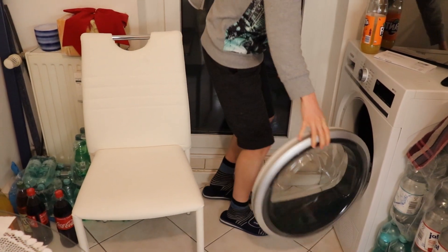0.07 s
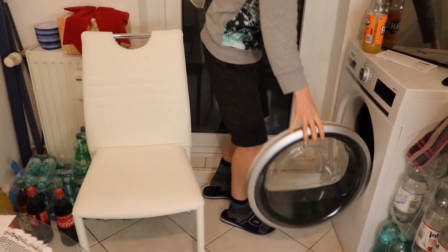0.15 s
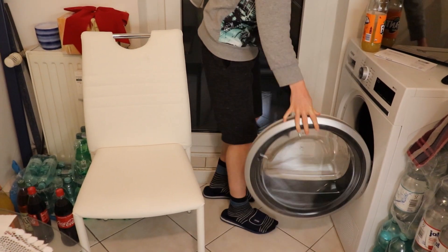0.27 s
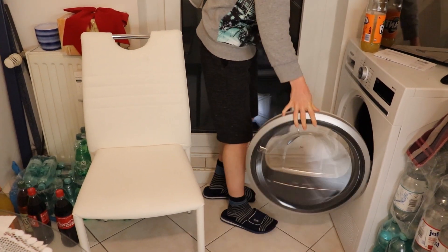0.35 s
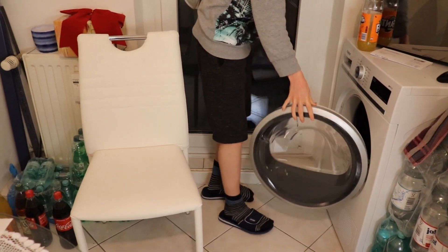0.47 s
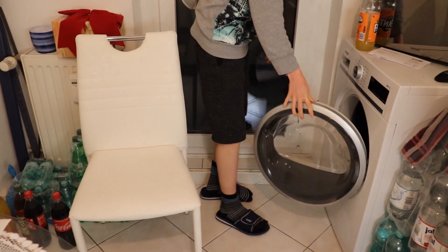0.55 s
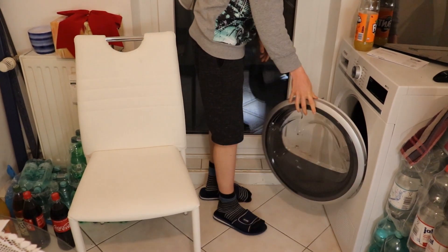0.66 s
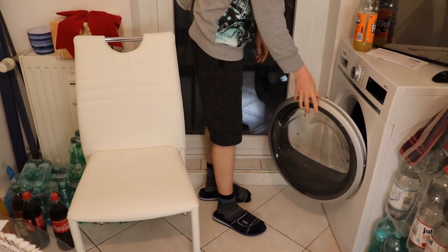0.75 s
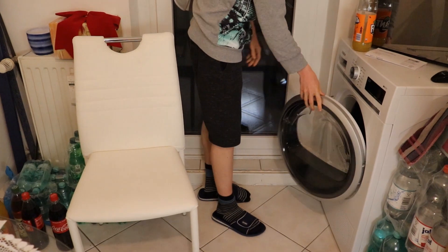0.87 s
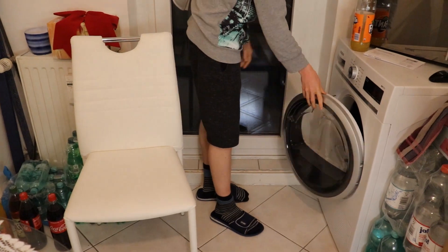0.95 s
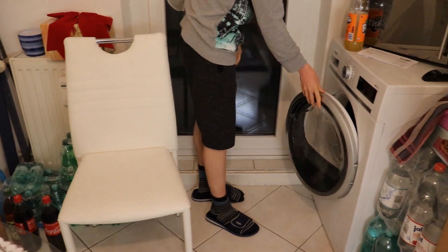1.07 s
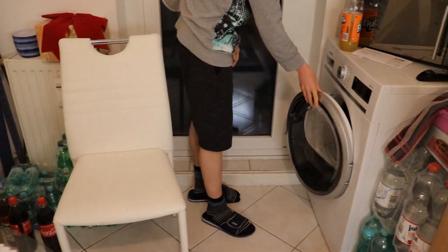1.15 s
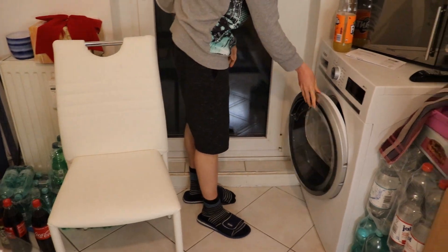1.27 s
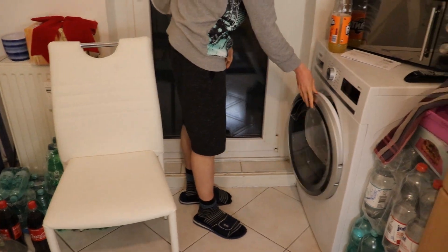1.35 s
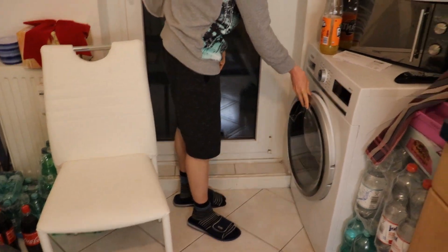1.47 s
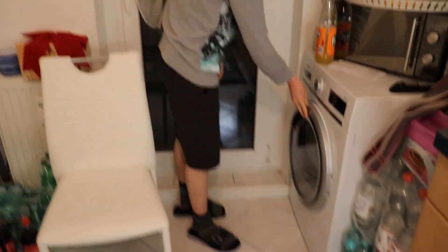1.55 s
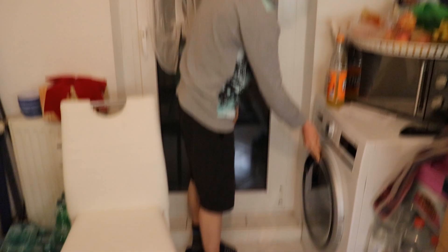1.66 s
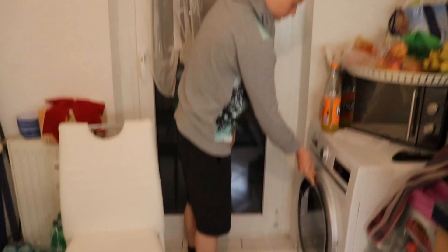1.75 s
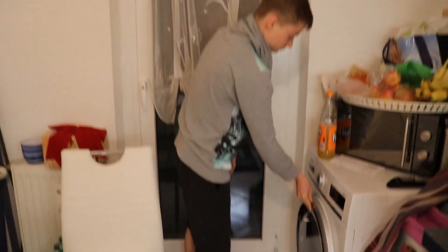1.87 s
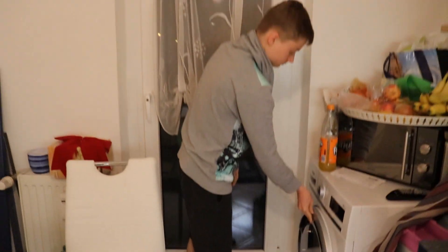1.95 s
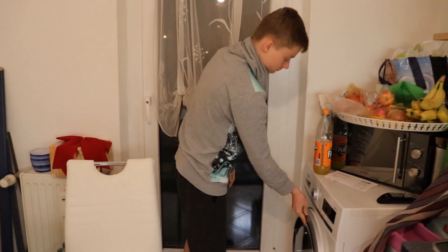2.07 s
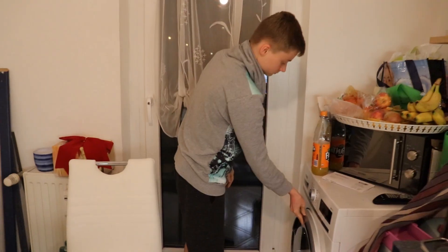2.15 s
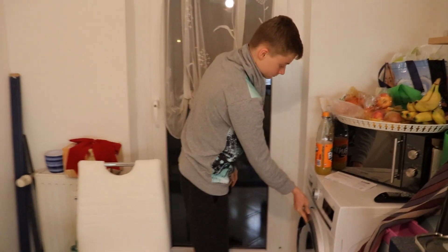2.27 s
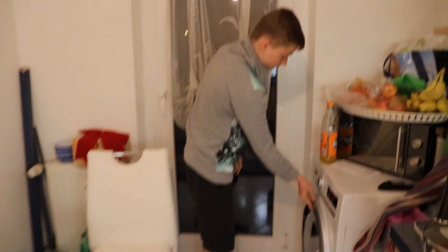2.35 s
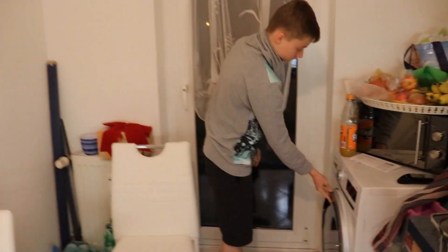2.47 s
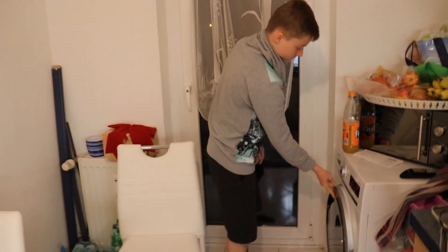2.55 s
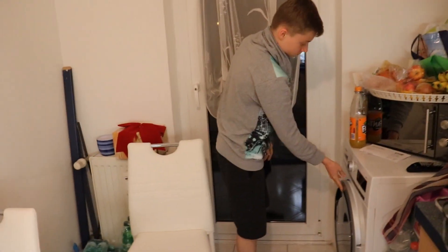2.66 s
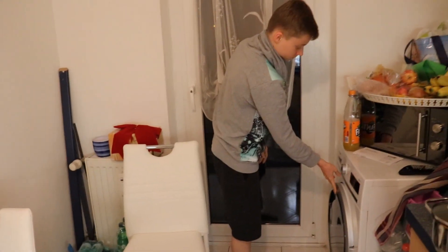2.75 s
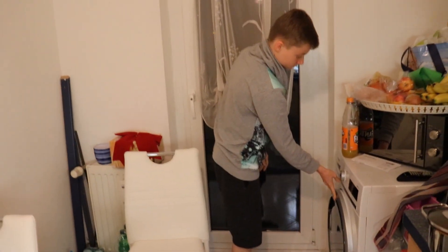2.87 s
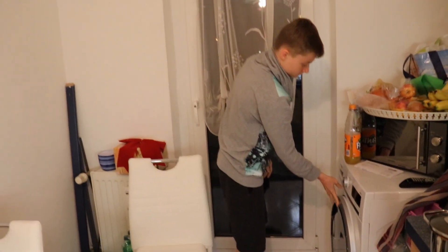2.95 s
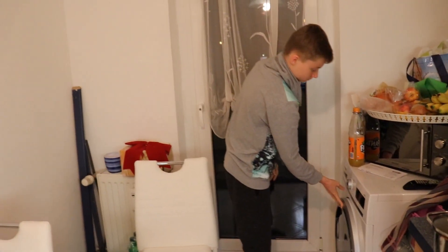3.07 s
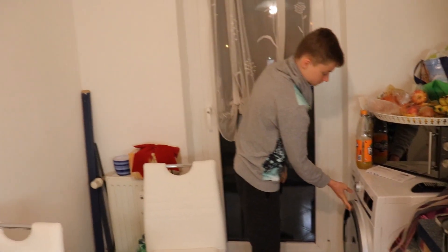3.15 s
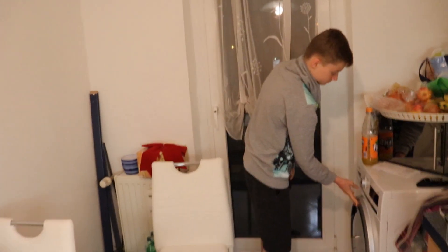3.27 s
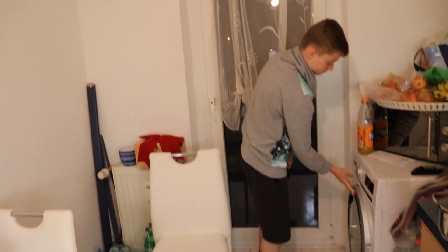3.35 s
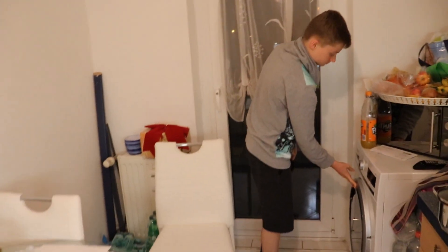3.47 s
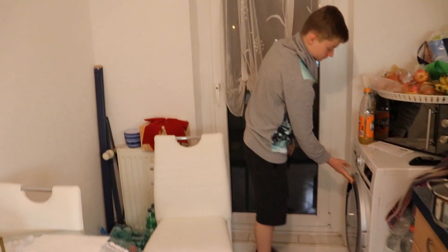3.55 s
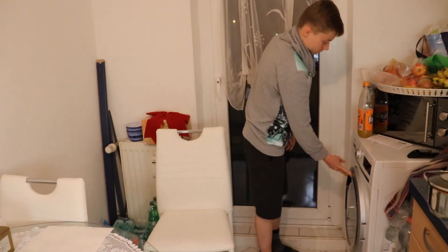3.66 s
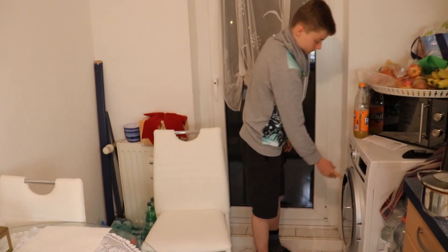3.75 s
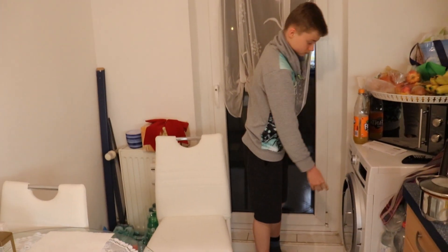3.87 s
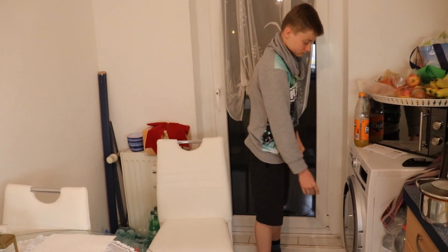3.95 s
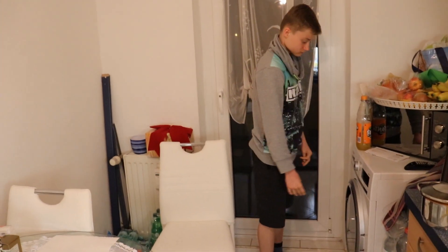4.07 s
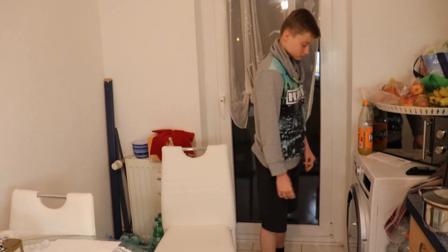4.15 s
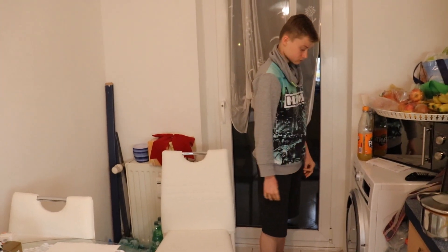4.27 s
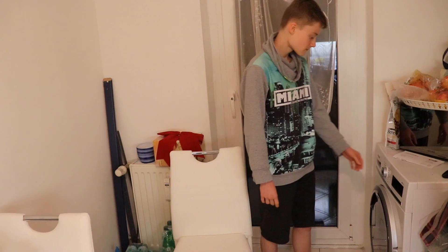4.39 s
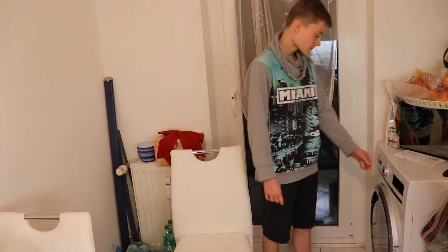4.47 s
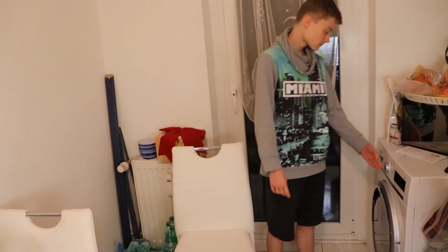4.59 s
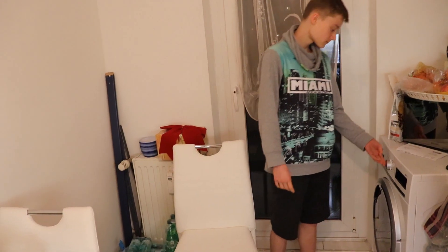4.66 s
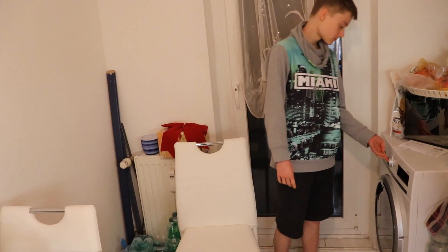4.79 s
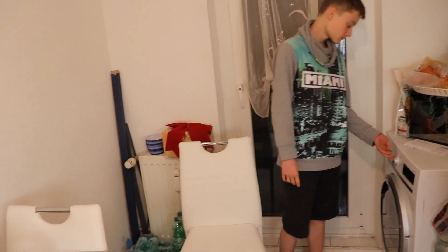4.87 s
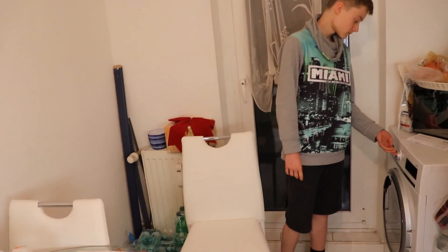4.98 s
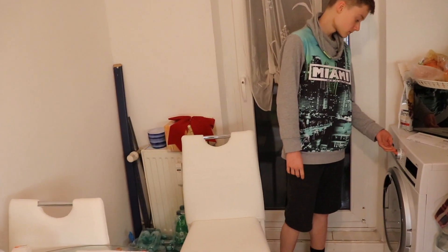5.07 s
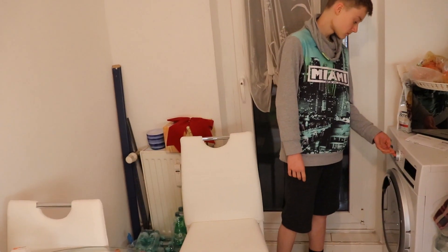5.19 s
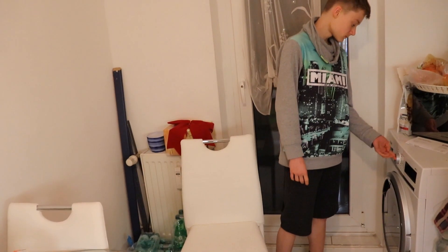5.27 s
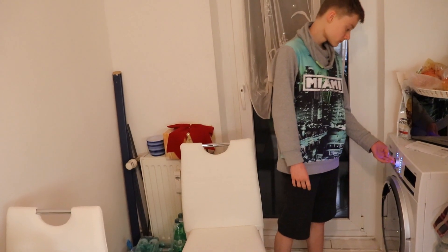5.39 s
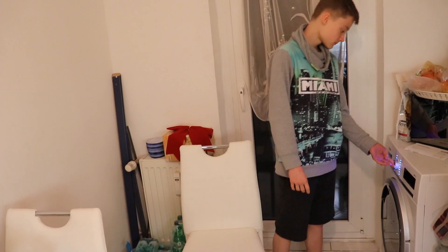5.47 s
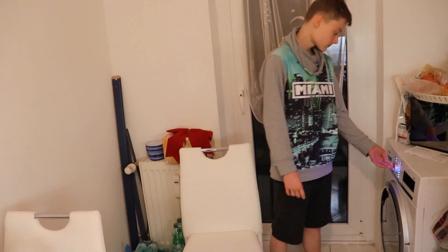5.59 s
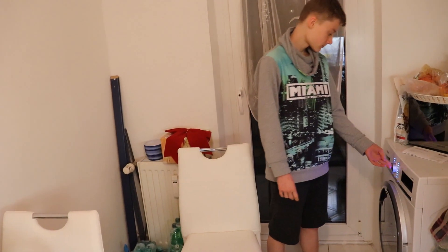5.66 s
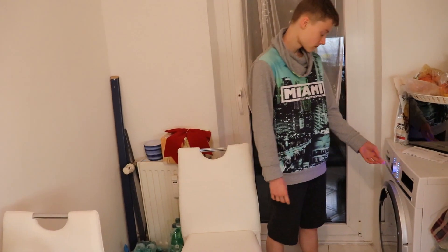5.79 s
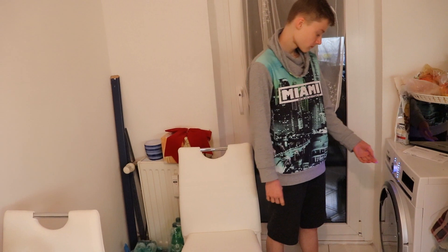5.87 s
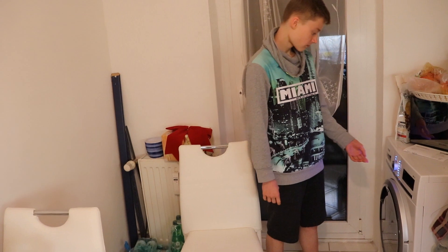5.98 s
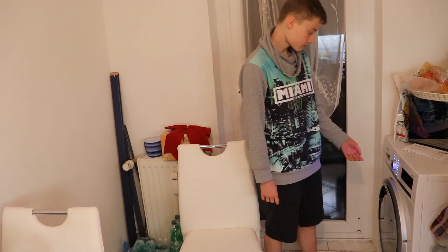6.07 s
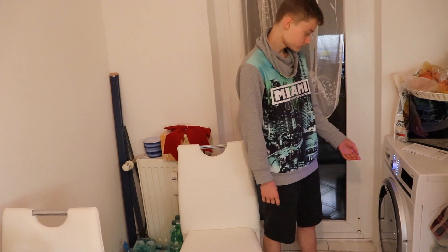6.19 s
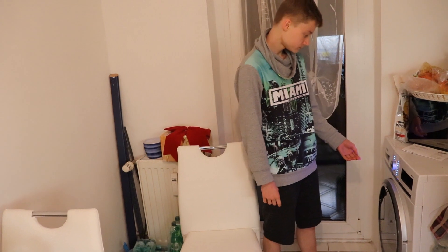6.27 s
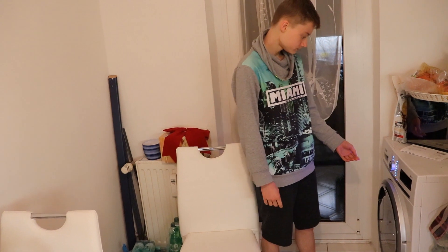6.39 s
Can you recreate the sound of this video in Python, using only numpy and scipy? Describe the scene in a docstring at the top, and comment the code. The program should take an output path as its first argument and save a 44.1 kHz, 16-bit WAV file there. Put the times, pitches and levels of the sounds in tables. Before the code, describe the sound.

In a tiled kitchen with a quiet fridge hum, soft ticks and cloth rustle come first. A washing machine door then bumps its latch with a rattling metallic boom, followed by light knocks and a rubber squeak. It slams shut with a sharp crack and deep cabinet thud. Hollow taps, a grinding knob, a dry snap and final clicks follow. Stereo microphone in the room, close and slightly hissy.

```python
"""A washing machine door bumps on its latch, is handled, then slams shut in a tiled kitchen with a humming fridge.
Noise bursts make the latch cracks and panel rattles; decaying modes make the booms of glass door and steel cabinet.
Shaped noise makes slippers, sleeves, rubber seal and knob grinding; ticks and a dry snap sound close to the microphone.
Hollow taps ring a box, the fridge sums shaft orders, the room adds a diffuse tail, and the input clips softly."""
import sys
import numpy as np
from scipy import signal
from scipy.fft import rfft, irfft, next_fast_len
from scipy.io import wavfile
from scipy.ndimage import map_coordinates

SR = 44100
rng = np.random.default_rng(int(sys.argv[2]) if len(sys.argv) > 2 else 0)


def log_audio(samples):
    """Write samples as a 16-bit WAV file to the path given in sys.argv[1]."""
    # one column per channel
    frames = np.atleast_2d(samples).T
    # limit to full scale, then quantise
    limited = np.clip(frames, -1, 1)
    pcm = np.round(limited * 32767).astype(np.int16)
    wavfile.write(sys.argv[1], SR, pcm)


N = 283254  # length in samples

# Steady air, room tone and microphone hiss: [f/Hz, relative level/dB per Hz]
AIR_SPECTRUM = [(76, -22), (130, -3.5), (147, -8.5), (207, -4.5), (386, -8), (444, -8), (533, -7),
                (577, -8), (797, -12.5), (1400, -14), (2670, -16), (3260, -16.5), (10900, -27.5),
                (14800, -29), (16000, -29.5)]
# Left-right likeness of steady sound: [f/Hz, correlation]
STEADY_LIKENESS = [(60, -0.22), (150, 0.81), (380, 0.66), (950, 0.49), (2380, -0.048), (5980, -0.058),
                   (15000, -0.077)]
# Left-right likeness of diffuse sound: [f/Hz, correlation]
DIFFUSE_LIKENESS = [(100, 0.97), (400, 0.88), (1000, 0.53), (2500, 0.064), (12000, 0.017)]
AIR_DB = -54

# Fridge hum at the microphone: [t/s, shaft level/dB, second order level/dB, upper orders level/dB]
FRIDGE_LEVELS = [(0, -69, -60.5, -56.5), (1.6, -66, -59.5, -57.5), (2.3, -62, -59.5, -55),
                 (3, -55, -59.5, -65), (3.8, -52.5, -59, -55), (4.3, -49.5, -56.5, -58.5),
                 (4.6, -53.5, -61.5, -60), (6.42, -54, -58.5, -60)]
# Upper orders of the compressor shaft: [order, relative level/dB]
UPPER_ORDERS = [(3, -8.5), (4, -7), (6, -9), (7, -8.5), (8, -4), (9, -2.5), (10, -14.5), (12, -13)]
SHAFT_HZ = 49.54  # mean shaft rate

# Ticks close to the microphone: [t/s, level/dB, f/Hz of the pitch, t60/s, left-right level/dB]
TICKS_NEAR = [(.251, -35.5, 2100, 0.15, -1), (0.2573, -42, 2570, 0.18, -3), (.329, -50, 1990, 0.094, -8),
              (0.3545, -46, 2330, 0.055, -7), (4.429, -54, 1660, 0.039, 0), (5.1862, -43, 1510, 0.093, -13)]
# Room decay: [f/Hz, t60/s]
ROOM_DECAY = [(150, 0.67), (1500, 0.43), (6000, 0.41), (15000, 0.22)]

# Slipper strokes on the tiles: [t/s of the start, length/s, level/dB]
SLIPPER_STROKES = [(0.576, 0.28, -44), (1.618, 0.18, -52.5), (2.865, 0.18, -45.5), (4.846, 0.097, -49)]
# Slipper colour: [f/Hz, relative level/dB per Hz]
SLIPPER_SPECTRUM = [(650, -31), (1100, -13), (1440, -11), (1820, -7.5), (4130, -5.5), (7650, -12),
                    (11700, -20.5), (14500, -19.5), (16000, -29)]
# Cloth and hands rubbing, one curve per passage: [t/s, level/dB]
RUB_LEVELS = [
    [(0, -44.5), (.19, -55), (.36, -47), (.5, -57)],
    [(1.1, -66), (1.2, -53), (1.35, -78)],
    [(2.1, -55), (2.25, -41), (2.35, -50.5), (2.65, -53), (2.9, -82), (3.1, -56.5), (3.45, -51)],
    [(4.65, -67), (4.82, -55), (4.9, -48), (4.97, -55), (5.08, -50.5), (5.55, -62.5)],
]
# Rubbing colour: [f/Hz, relative level/dB per Hz]
RUB_SPECTRUM = [(88, -48), (150, -11.5), (240, -7.5), (275, -14), (383, -8.5), (589, -11), (821, -10.5),
                (1830, -9.5), (16000, -26.5)]
SWISH_ATTACK, SWISH_RELEASE = 0.28, 0.39  # shares of the stroke length
SWISH_SAG_DB, SWISH_EDGE_DB = -0.5, -15  # at the end of the hold; at both ends of the stroke

# Door and cabinet contacts: [t/s, crack level/dB, rattle level/dB, boom level/dB,
# base rattle t60/s, hardness/dB per octave, f/Hz of the boom centre]
CONTACTS = [(1.7605, -30, -23.5, -30, 0.14, 0.5, 213), (1.765, -23, -17.5, -16, 0.31, -0.5, 213),
            (1.7756, -48, -22, -12.5, 0.5, -2, 277), (1.785, -48, -21.5, -23.5, 0.13, -2.5, 650),
            (1.7946, -42, -20, -20, 0.17, 1, 170), (1.9132, -37.5, -40, -26, 0.41, 2, 223),
            (1.9431, -43, -38, -28.5, 0.11, -5, 258), (2.0265, -65, -54.5, -40, 0.66, 6, 190),
            (2.1338, -45, -46, -59, 0.23, -1, 216), (2.196, -42, -50, -46, 0.13, 2, 800),
            (2.2024, -32, -39.5, -36.5, 0.23, 1, 366), (2.2568, -38, -42, -40, 0.21, 1, 493),
            (2.3516, -41, -42, -50, 0.61, 1.7, 800), (2.4416, -44, -45.5, -42, 0.68, 0.5, 377),
            (2.634, -51, -42, -41.5, 0.85, -2.5, 226), (2.674, -40.5, -40.5, -42, 0.31, -1, 355),
            (2.751, -43, -41, -34, 0.25, 5, 240), (2.79, -60, -45, -39, .2, 0, 240),
            (3.0649, -45.5, -47, -54, 0.71, 0.3, 194), (3.1592, -62, -50.5, -39, 0.4, -0.5, 222),
            (3.322, -41.5, -42, -39, 1, 2.1, 331), (3.4124, -41.5, -39.5, -32, 1, 1.5, 97),
            (3.457, -7.5, -13, -17, 0.16, 3.5, 352), (3.4618, -15.5, -27, -27, 0.077, -4, 352),
            (3.4783, -45, -20, -14.5, 0.51, -1.6, 156), (3.57, -62, -27.5, -19, 0.69, 0, 197),
            (3.6591, -38, -32.5, -28.5, 0.38, -3, 137), (3.7607, -49, -45, -40, 0.48, 4.5, 151),
            (3.8388, -43, -43.5, -42, 0.56, 3.5, 98), (3.9117, -59, -39.5, -37.5, 0.46, -7.5, 92)]
# Latch crack colour: [f/Hz, relative level/dB per Hz]
CRACK_SPECTRUM = [(530, -47), (900, -10), (1990, -6.5), (2450, -3), (3270, 3.5), (6190, -12), (6730, -7.5),
                  (8990, -13.5), (12300, -12.5), (16000, -19.5)]
# Modes of the steel latch hook: [f/Hz, relative level/dB, t60/s]
HOOK_MODES = [(1516, -7, 0.029), (1940, -14, 0.036), (2640, -15, 0.044), (3400, -6, 0.02),
              (14920, 0.5, 0.012)]
# Latch bearing as the microphone swings: [t/s, left-right level/dB]
LATCH_BEARING = [(1.76, -2), (1.95, -3), (2.4, -3.5), (3.46, -4.5)]
# Shading by the body that holds the microphones: [f/Hz, share of the left-right dB]
BODY_SHADOW = [(2000, 2.7), (8000, 0.3), (13000, 3)]
# Panel rattle colour: [f/Hz, relative level/dB per Hz]
RATTLE_SPECTRUM = [(290, -3), (500, 0), (570, -6.5), (649, 3.5), (1320, -1.5), (1740, 0.5), (1980, -3),
                   (2330, -3), (4280, -12.5), (6610, -17), (9490, -25.5), (15100, -30.5), (16000, -40)]
# Change of rattle colour once the door is latched: [f/Hz, level/dB]
LATCHED_RATTLE = [(400, 1.5), (600, -2.5), (1100, -3.5), (1800, 0.5), (3000, 0)]
# Rattle decay: [f/Hz, t60 as a share of the base t60]
RATTLE_DECAY = [(400, 0.69), (1000, 0.87), (1900, 1.045), (3500, 0.95), (7000, 1.12), (14000, 1)]
# Free modes of the glass door: [f/Hz, relative level/dB, t60/s]
DOOR_MODES = [(53.4, -5, .4), (133.6, -3, 0.45), (176.5, -2, 0.24), (240.2, -1.5, 0.4), (348, -6, 0.29),
              (383.4, -8, 0.4), (587, -8.5, 0.15), (625.7, -1.5, 0.24), (727, 0.5, 0.15), (803, -14, 0.1),
              (1050, -9, 0.1)]
# Free modes of the steel cabinet: [f/Hz, relative level/dB, t60/s]
CABINET_MODES = [(48.8, -8.5, 0.96), (85.5, -5.5, 0.7), (97.8, -5, 0.36), (138.3, -8.5, 0.75),
                 (179.2, -6.5, 0.73), (202.8, -7.5, 0.61), (258.5, -14, 0.54), (312.7, -9, 0.7),
                 (367.5, -3.5, 0.37), (416, -11.5, 0.32), (476, -18, 0.38), (668, -14.5, 0.52)]
LATCHED_S = 3.45
LOOSE_DOOR, SHUT_DOOR = 0.69, 0.38  # door's share of the boom before and after latching
DOOR_DAMPING, CABINET_DAMPING = 0.69, 0.99  # t60 as a share of the free modes'
HARD_RISE_S, SOFT_RISE_S = 0.0013, 0.0014  # base rise of the hardest and softest blow
WAVER = 0.84  # phase wander of the panel modes, radians
FLUTTER_DB = 2.5  # level wander of a mode per radian of phase wander

# Loose parts set chattering: [t/s, level/dB, t60/s, f/Hz of the median pitch]
SHAKES_LOOSE = [(1.766, -25, .45, 1750), (1.79, -29, 0.46, 1054), (2.196, -48, 0.17, 844),
                (2.351, -48, .1, 855), (3.475, -25.5, .6, 1790), (3.59, -35, 0.53, 1890)]
CHATTER_SPREAD, CHATTER_SCATTER_DB = 0.19, 6  # standard deviations: natural log of pitch; tap level
CHATTER_CYCLES = 13  # cycles in which a tap falls 20 dB

# Rubber seal dragging on the door rim, one curve per drag: [t/s, level/dB, f/Hz of its resonance]
SEAL_DRAGS = [
    [(2.37, -72, 2160), (2.5, -58, 1850), (2.56, -47.5, 1490), (2.63, -61, 1385)],
    [(3.325, -49, 1490), (3.4, -54, 1486), (3.455, -42, 1510)],
]

# Taps on a hollow box: [t/s, ring level/dB, scratch level/dB]
BOX_TAPS = [(4.489, -27, -37.5), (4.51, -32, -62), (4.525, -33, -57), (4.535, -41.5, -50),
            (4.603, -38, -46), (4.615, -45, -52), (4.625, -36.5, -53.5)]
# Box modes: [f/Hz, relative level/dB, t60/s]
BOX_MODES = [(210, -3.5, 0.055), (292, -4, 0.067), (347, -2.5, 0.081), (420, -1.5, 0.037),
             (555, -1.5, 0.035), (630, -8, 0.034), (738, -14, 0.063)]
# Scratch colour of the taps: [f/Hz, relative level/dB per Hz]
SCRATCH_SPECTRUM = [(600, -1.5), (1200, 1), (1800, 2), (2500, 0), (3700, 0), (5000, -10), (15000, -23.5)]

# Knob detents: [t/s, click level/dB, unused level/dB, grinding level/dB, base t60/s]
KNOB_DETENTS = [(4.999, -48, -55, -45.5, 0.23), (5.0424, -46.5, -45, -44.5, 0.47),
                (5.1465, -33, -60, -37, 0.12), (5.161, -39, -50, -31.5, .1), (5.172, -38, -43, -36, 0.097),
                (5.179, -44, -44, -36, .06), (5.1895, -46.5, -61, -37, 0.22), (5.749, -50, -60, -62, 0.22),
                (5.77, -34, -41, -41.5, 0.38), (5.7933, -28, -48, -43, 0.2),
                (5.8381, -37.5, -37.5, -39.5, 0.21)]
# Knob resonances, all following the click level: [f/Hz, width/Hz, relative level/dB, unused]
KNOB_RESONANCES = [(101, 46, -13.5, 0.12), (190, 180, -3, 0.049), (1290, 500, -3.5, 1)]
# Ring of the knob shell: [f/Hz, relative level/dB, t60/s]
SHELL_MODES = [(1325, 2.5, 0.053), (1210, -10, 0.06)]
# Grinding colour: [f/Hz, relative level/dB per Hz]
GRIND_SPECTRUM = [(500, -16.5), (1200, -1), (3500, 7.5), (6500, 2), (9000, -4), (16000, -16)]
DULL_DB, BRIGHTENS = -4.5, 0.25  # tilt per octave at a -31.5 dB click; its growth per dB of click
SHELL_DB = -2.5  # shell ring relative to the click

# Dry snap close to the microphone: [t/s, level/dB, left-right level/dB]
DRY_SNAPS = [(5.598, -36, -6)]
# Snap modes: [f/Hz, relative level/dB, t60/s]
SNAP_MODES = [(453, -7, 0.0088), (890, 1.5, 0.013), (1890, -0.5, 0.0078), (3500, -3.5, 0.006),
              (6640, -2, 0.0045), (9500, -9.5, 0.0043)]

TOP_HZ = 16180  # band limit of the input


def amp(db):
    """Gain of a level in dB."""
    return 10 ** (np.asarray(db) / 20)


def unit(x):
    """Scale to rms 1."""
    return x / np.sqrt(np.mean(x ** 2) + 1e-20)


def along(points, hz):
    """Interpolate (Hz, value) points on a log frequency axis."""
    f, v = np.transpose(points)
    return np.interp(np.log(hz + 1), np.log(f + 1), v)


def tilted(spectrum, db_per_octave):
    """Turn a spectrum about 2 kHz."""
    return [(hz, db + db_per_octave * np.log2(hz / 2000)) for hz, db in spectrum]


def gain(rows, column=1):
    """Gain per sample of a dB curve over time, at -150 dB outside it."""
    rows = np.array(rows)
    return amp(np.interp(np.arange(N) / SR, rows[:, 0], rows[:, column], -150, -150))


def wobble(rate):
    """A smooth random curve with rate knots a second."""
    knots = rng.standard_normal(int(N * rate / SR) + 4)
    return map_coordinates(knots, [np.arange(N) * rate / SR])


def filtered(x, response):
    """Filter x by a complex response of frequency."""
    n = x.shape[-1]
    m = next_fast_len(n + 8192)
    return irfft(rfft(x, m) * response(np.fft.rfftfreq(m, 1 / SR)), m)[..., :n]


def pair(size, spectrum, alike):
    """Stereo noise of rms 1, its mid-side balance set by the left-right likeness."""
    def mid_side(hz):
        angle = np.arccos(np.clip(along(alike, hz), -1, 1)) / 2
        return amp(along(spectrum, hz)) * [np.cos(angle), np.sin(angle)]

    mid, side = filtered(rng.standard_normal((2, size)), mid_side)
    return unit(np.array([mid + side, mid - side]))


def dying(noise, t60, rise=0.00044):
    """Noise whose frequencies each die with their own t60(Hz), after a short rise in seconds."""
    hz, t, z = signal.stft(noise, SR, nperseg=128)
    decay = amp(-60 * t / np.maximum(t60(hz), .01)[:, None])
    out = signal.istft(z * decay, SR, nperseg=128)[1]
    size = noise.shape[1]
    return out[:, :size] * (1 - np.exp(-np.arange(size) / SR / max(rise, 2e-4)))


def add(out, s, x, pan_db=0):
    """Mix a sound into stereo at s seconds, the left louder than the right by pan_db."""
    part = out[:, round(s * SR):][:, :x.shape[-1]]
    part += (x * amp([[pan_db / 2], [-pan_db / 2]]))[:, :part.shape[1]]


def ring(modes, t, stretch=1, centre_hz=200, focus_db=0, waver=0):
    """Decaying modes of random strength and phase, weaker away from the blow's centre pitch."""
    hz, db, t60 = np.transpose(modes)[:, :, None]
    luck = rng.standard_normal((2, len(modes), 1))
    db = db + 1.5 * luck[0] - focus_db * np.log2(hz / centre_hz) ** 2
    knots = rng.standard_normal((len(modes), 40))  # 40 a second
    wander = np.array([np.interp(t, np.arange(40) / 40, row) for row in knots])
    # each mode's level follows the wander rows in reverse order
    level = amp(db - 60 * t / (t60 * stretch) + FLUTTER_DB * waver * wander[::-1])
    phase = 2 * np.pi * hz * t + 2 * luck[1] + waver * wander
    return np.sum(level * np.sin(phase), axis=0)


def steady_air():
    """Room tone and microphone hiss as coloured noise with a slight level wander."""
    return amp(AIR_DB + 0.15 * wobble(3.8)) * pair(N, AIR_SPECTRUM, STEADY_LIKENESS)


def fridge():
    """The compressor hums on the orders of its shaft, with slightly unsteady speed and levels."""
    turn = 2 * np.pi * np.cumsum(SHAFT_HZ * (1 + 0.0028 * wobble(3))) / SR
    upper = sum(amp(db + 1.26 * wobble(8.7)) * np.sin(order * turn + rng.uniform(0, 2 * np.pi))
                for order, db in UPPER_ORDERS)
    first = gain(FRIDGE_LEVELS, column=1) * amp(0.71 * wobble(4.05)) * np.sin(turn)
    second = gain(FRIDGE_LEVELS, column=2) * amp(2.7 * wobble(18)) * np.sin(2 * turn)
    return np.sqrt(2) * (first + second) + gain(FRIDGE_LEVELS, column=3) * upper


def ticks():
    """Dry bright ticks: decaying broad noise peaked at a pitch."""
    out, t = np.zeros((2, N)), np.arange(4000) / SR
    for s, db, pitch_hz, t60, pan_db in TICKS_NEAR:
        colour = [(pitch_hz / 3, -25), (pitch_hz, 0), (16000, -9)]
        add(out, s, amp(db - 60 * t / t60) * pair(4000, colour, [(1000, 0.15)]), pan_db)
    return out


def kitchen(x):
    """The tiled room answers the mono sum with a diffuse tail of dying noise."""
    noise = pair(SR // 2, [(100, 0)], DIFFUSE_LIKENESS)
    tail = dying(noise, lambda hz: along(ROOM_DECAY, hz), 0.0058)
    return signal.fftconvolve(x.mean(axis=0)[None], tail / np.linalg.norm(tail[0]), axes=1)[:, :N]


def rubbing():
    """Slippers swish on the tiles with attack, sagging hold and release; cloth and hands rub in uneven grains."""
    shape = [(0, SWISH_EDGE_DB), (SWISH_ATTACK, 0), (1 - SWISH_RELEASE, SWISH_SAG_DB), (1, SWISH_EDGE_DB)]
    strokes = sum(gain([(s + length * share, db + step_db) for share, step_db in shape])
                  for s, length, db in SLIPPER_STROKES)
    swish = strokes * amp(0.35 * wobble(40)) * pair(N, SLIPPER_SPECTRUM, DIFFUSE_LIKENESS)
    grains = amp(1.3 * wobble(30) + 2.36 * wobble(250))
    rub = unit(grains * pair(N, RUB_SPECTRUM, DIFFUSE_LIKENESS))
    return swish + sum(map(gain, RUB_LEVELS)) * rub


def latch_crack(crack_db, hard_db, pan_db):
    """A short noise burst and the steel hook's ring, shaded between the two microphones."""
    t = np.arange(2000) / SR
    crack = pair(2000, tilted(CRACK_SPECTRUM, hard_db), [(1000, 0.37)])
    crack *= amp(-60 * t / 0.048) * (1 - np.exp(-t / 0.00091))
    hook_gain = amp(0.46 * (crack_db + 9))  # the hook's share grows with harder blows
    crack += hook_gain * ring(HOOK_MODES, t) * (1 - np.exp(-t / 0.00015))
    shaded = lambda hz: amp(np.outer([.5, -.5], pan_db * along(BODY_SHADOW, hz)))
    return amp(crack_db) * filtered(crack, shaded)


def panel_rattle(size, latched, t60, hard_db, rise):
    """Diffuse noise dying by frequency, its colour changed once the door is latched."""
    colour = [(hz, db + latched * along(LATCHED_RATTLE, hz))
              for hz, db in tilted(RATTLE_SPECTRUM, hard_db)]
    return dying(pair(size, colour, DIFFUSE_LIKENESS), lambda hz: t60 * along(RATTLE_DECAY, hz), rise)


def panel_boom(t, door_share, boom_db, boom_hz, rise):
    """Wavering modes of door and cabinet, stirred around the blow's centre pitch."""
    focus_db = 2.0 + 0.45 * max(-25.5 - boom_db, 0)  # a light touch stirs only a few modes
    door = ring(DOOR_MODES, t, DOOR_DAMPING, boom_hz, focus_db, WAVER)
    cabinet = ring(CABINET_MODES, t, CABINET_DAMPING, boom_hz, focus_db, WAVER)
    boom = door_share * door + (1 - door_share) * cabinet
    return amp(boom_db) * boom * (1 - np.exp(-t / (rise + 0.0013))) ** 2


def knocks():
    """Each contact cracks at the latch, rattles the panels and booms in door and cabinet."""
    (cracks, rattles, booms), size = np.zeros((3, 2, N)), int(.7 * SR)
    t = np.arange(size) / SR
    for s, crack_db, rattle_db, boom_db, rattle_t60, hard_db, boom_hz in CONTACTS:
        door_share = LOOSE_DOOR if s < LATCHED_S else SHUT_DOOR
        rise = np.interp(crack_db, [-60, -5], [SOFT_RISE_S, HARD_RISE_S])
        pan_db = np.interp(s, *np.transpose(LATCH_BEARING))
        add(cracks, s, latch_crack(crack_db, hard_db, pan_db))
        rattle = panel_rattle(size, s > LATCHED_S, rattle_t60, hard_db, rise)
        add(rattles, s, amp(rattle_db) * rattle)
        add(booms, s, panel_boom(t, door_share, boom_db, boom_hz, rise))
    uneven = amp(1.1 * wobble(90))  # loose parts rattle unevenly
    return cracks + rattles * uneven, booms


def chatter():
    """Loose parts tap at random moments, each tap a short ring near the shake's pitch."""
    out, life = np.zeros((2, N)), np.arange(600) / SR
    for s, db, t60, pitch_hz in SHAKES_LOOSE:
        when_where, luck = rng.random((150, 2)), rng.standard_normal((150, 2))
        delay = t60 / 2 * when_where[:, :1]
        hz = pitch_hz * np.exp(CHATTER_SPREAD * luck[:, :1])
        size_db = db - 60 * delay / t60 + CHATTER_SCATTER_DB * luck[:, 1:]
        decay_db = 20 * life * hz / CHATTER_CYCLES
        grains = amp(size_db - decay_db) * np.sin(2 * np.pi * hz * life)
        index = (np.round((s + delay) * SR).astype(int) + np.arange(len(life))).ravel()
        angle = np.pi / 2 * when_where[:, 1:]  # place of each tap between left and right
        for ear, share in zip(out, (np.cos, np.sin)):
            ear += np.bincount(index, (grains * share(angle)).ravel(), N)[:N]
    return out


def seal():
    """Rubber drags as narrow noise on a sliding resonance, different at each microphone."""
    out = np.zeros((2, N))
    for rows in SEAL_DRAGS:
        s, _, hz = np.transpose(rows)
        turn = 2 * np.pi * np.cumsum(np.interp(np.arange(N) / SR, s, hz)) / SR
        in_phase = np.array([wobble(800), wobble(800)])
        quadrature = np.array([wobble(800), wobble(800)])
        out += gain(rows) * unit(in_phase * np.cos(turn) + quadrature * np.sin(turn))
    return out


def taps():
    """Taps ring the modes of a hollow box, each with a scratch of dying noise."""
    out, size = np.zeros((2, N)), int(.4 * SR)
    t = np.arange(size) / SR
    for s, db, scratch_db in BOX_TAPS:
        add(out, s, amp(db) * ring(BOX_MODES, t) * (1 - np.exp(-t / 0.00054)))
        noise = pair(size, SCRATCH_SPECTRUM, DIFFUSE_LIKENESS)
        add(out, s, amp(scratch_db) * dying(noise, lambda hz: 0.25 * along(RATTLE_DECAY, hz)))
    return out


def knob():
    """Each detent grinds, and clicks with resonances that rise and fall together; harder clicks grind brighter."""
    (out, grinding), size = np.zeros((2, 2, N)), int(.4 * SR)
    t = np.arange(size) / SR
    for s, click_db, _, grind_db, t60 in KNOB_DETENTS:
        push = pair(size, [(100, 0)], DIFFUSE_LIKENESS)
        push *= amp(-60 * t / t60) * (1 - np.exp(-t / 0.0034))
        for centre, width, db, _ in KNOB_RESONANCES:
            # squared band-pass for steep skirts
            mode = lambda f: (1j * f * width / (centre * centre - f * f + 1j * f * width)) ** 2
            bandwidth_gain = np.sqrt(2 * SR / (np.pi * width))  # makes up for the narrow band
            add(out, s, amp(db + click_db) * filtered(push, mode) * bandwidth_gain)
        add(out, s, amp(click_db + SHELL_DB) * ring(SHELL_MODES, t) * (1 - np.exp(-t / .001)))
        colour = tilted(GRIND_SPECTRUM, DULL_DB + BRIGHTENS * (click_db + 31.5))
        noise = pair(size, colour, DIFFUSE_LIKENESS)
        grind = dying(noise, lambda hz: 1.13 * t60 * along(RATTLE_DECAY, hz), 0.0025)
        add(grinding, s, amp(grind_db) * grind)
    return out + grinding * unit(amp(2.9 * wobble(500)))  # the ratchet catches in uneven grains


def dry_snap():
    """A few very short modes, all struck together."""
    out, t = np.zeros((2, N)), np.arange(1000) / SR
    for s, db, pan_db in DRY_SNAPS:
        snap = sum(amp(mode_db - 60 * t / t60) * np.sin(2 * np.pi * hz * t)
                   for hz, mode_db, t60 in SNAP_MODES)
        add(out, s, amp(db) * snap, pan_db)
    return out


def scene():
    """All sources direct, with the room's answer to the machine, its booms and the close sounds."""
    rattles, booms = knocks()
    machine = rattles + chatter() + knob() + taps()
    near = ticks() + dry_snap()
    room = kitchen(amp(-8.0) * machine + amp(-11.5) * booms + amp(-12.0) * near)
    return machine + booms + near + room + rubbing() + seal() + fridge() + steady_air()


def record(dry):
    """The input clips softly towards 0.95 of full scale, then a steep filter cuts all above the band limit."""
    clipped = dry / (1 + np.abs(dry / .95) ** 6) ** (1 / 6)
    return filtered(clipped, lambda hz: hz < TOP_HZ)


dry = scene()
out = record(dry)
log_audio(out)
```